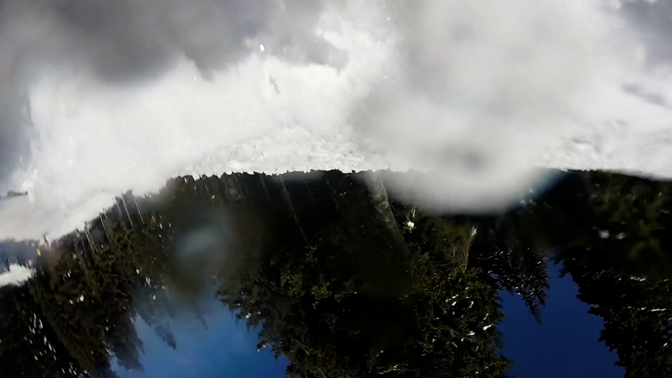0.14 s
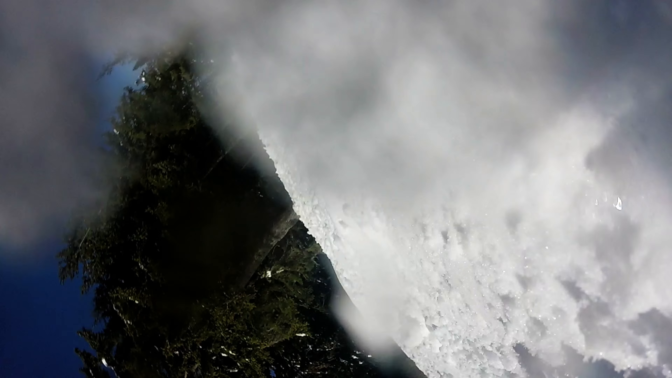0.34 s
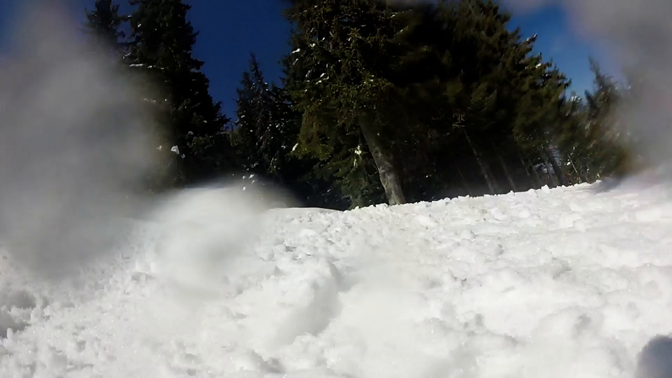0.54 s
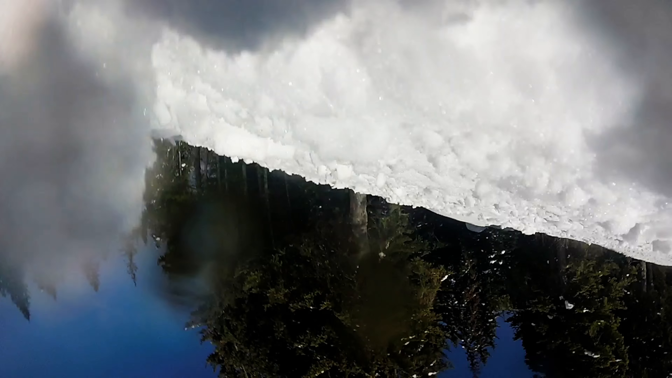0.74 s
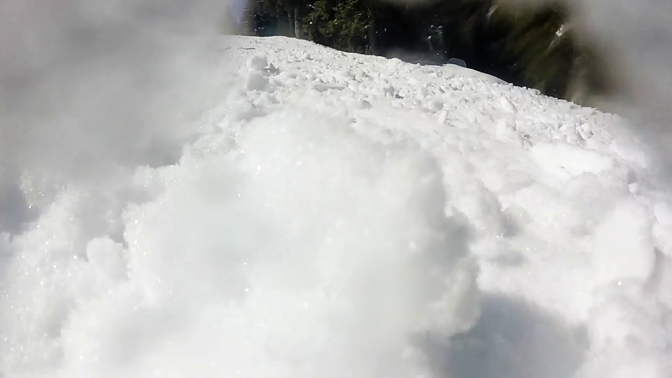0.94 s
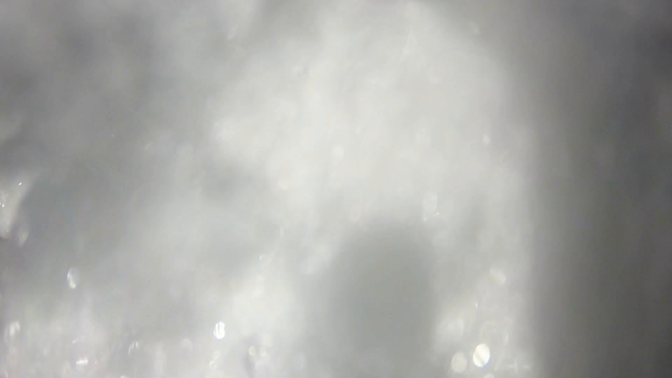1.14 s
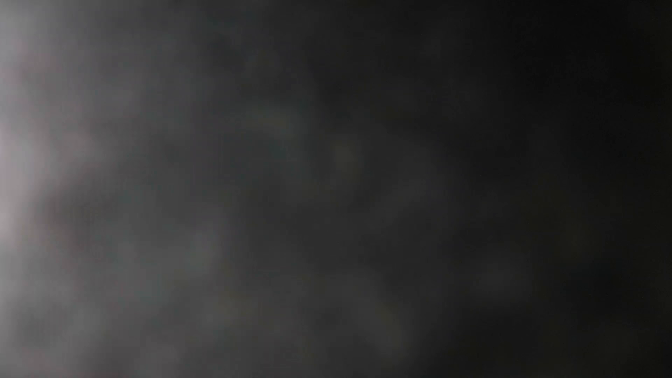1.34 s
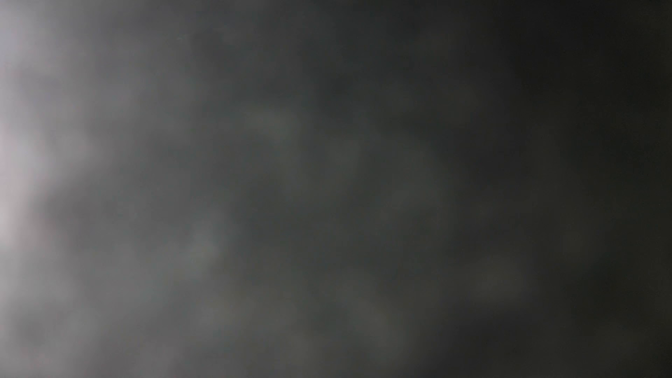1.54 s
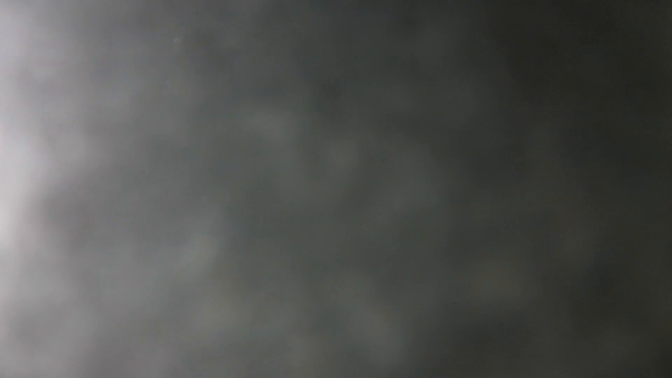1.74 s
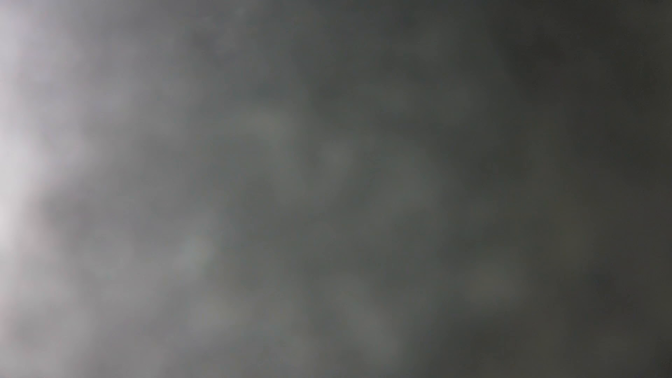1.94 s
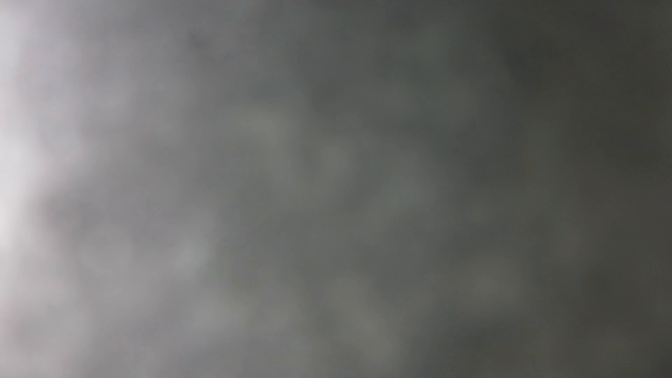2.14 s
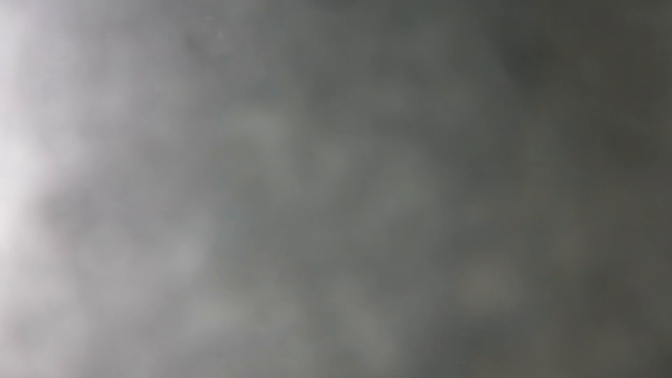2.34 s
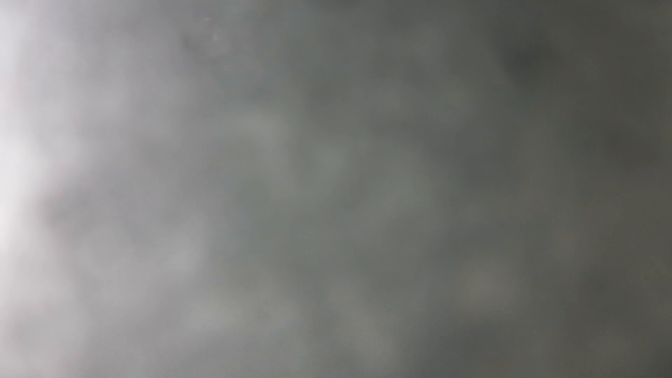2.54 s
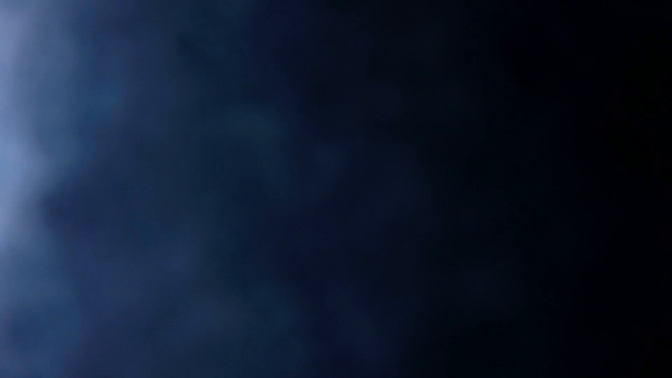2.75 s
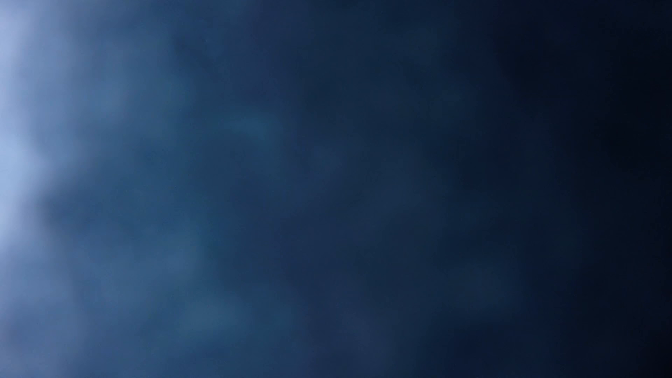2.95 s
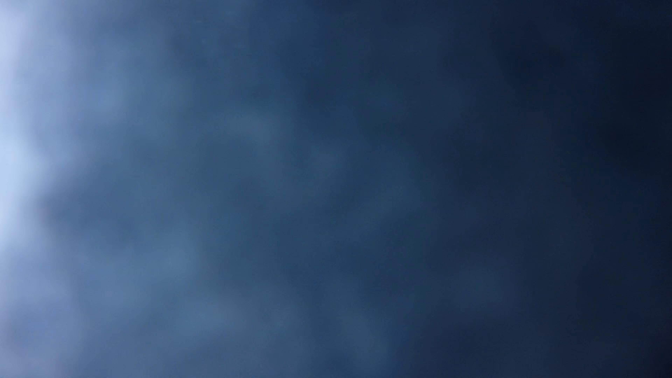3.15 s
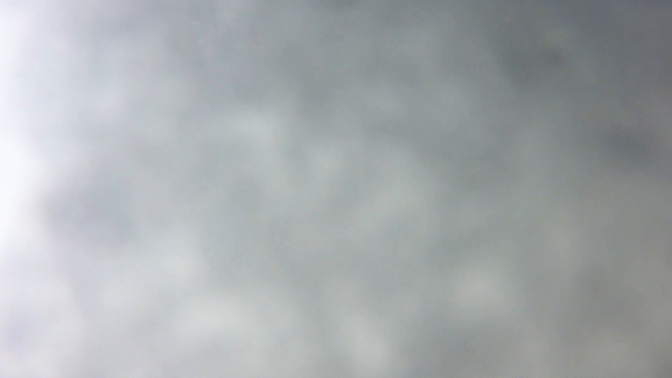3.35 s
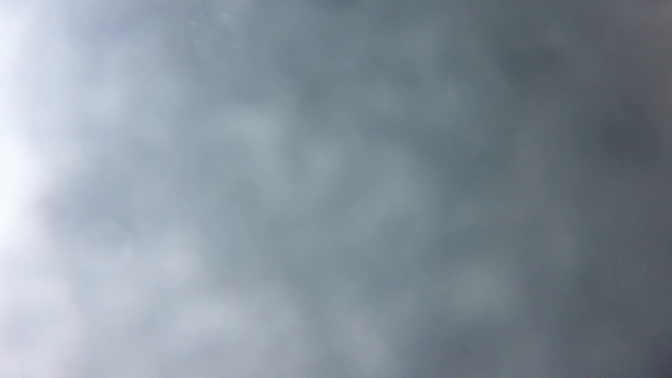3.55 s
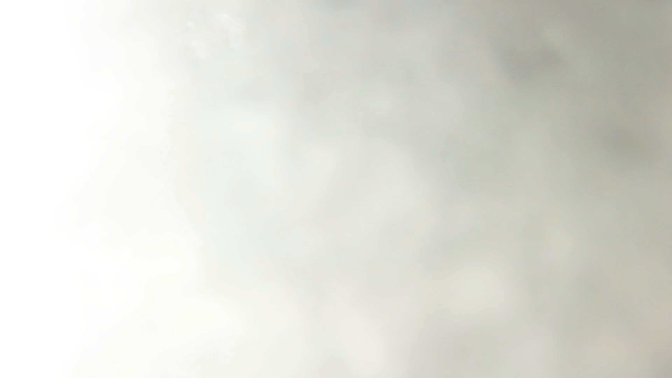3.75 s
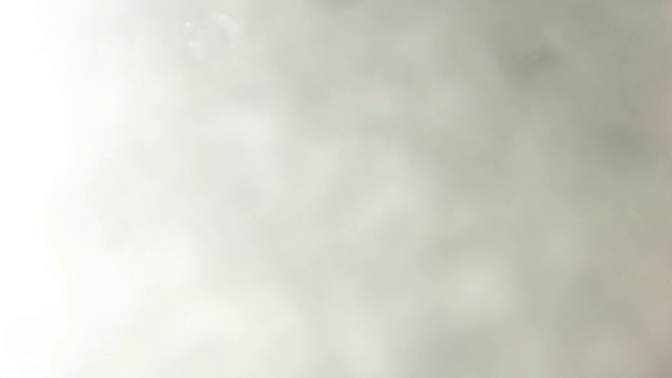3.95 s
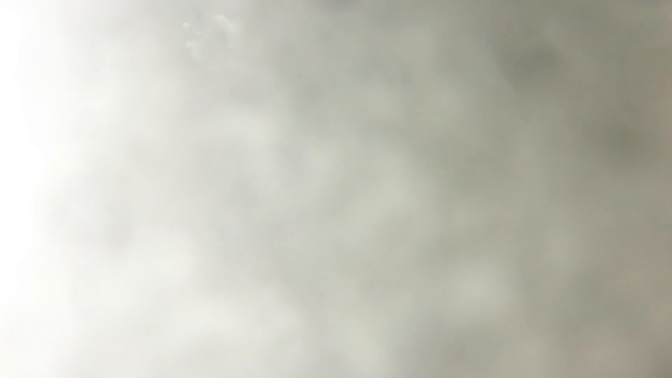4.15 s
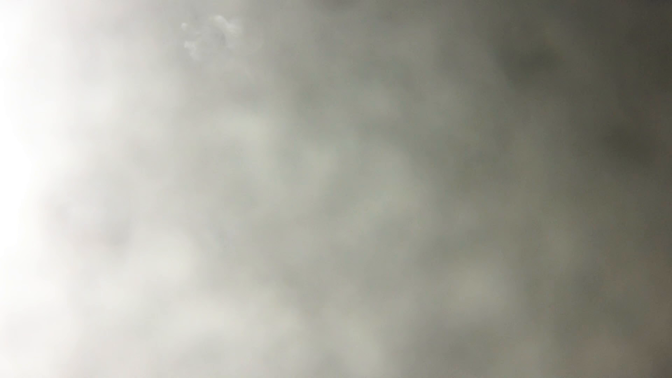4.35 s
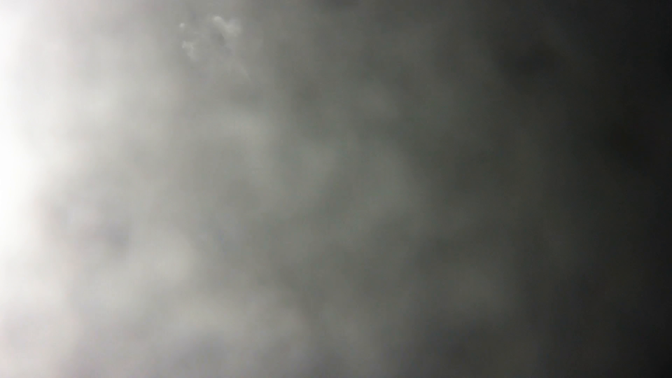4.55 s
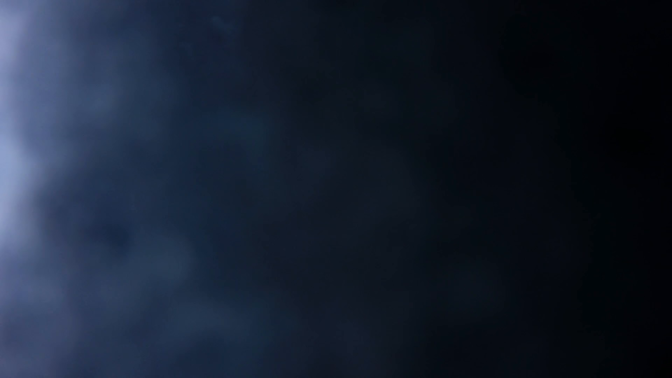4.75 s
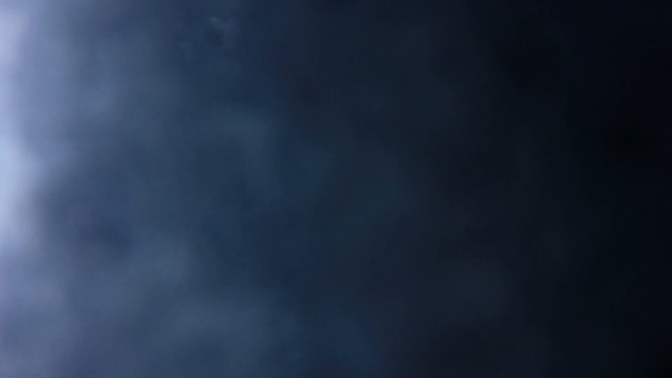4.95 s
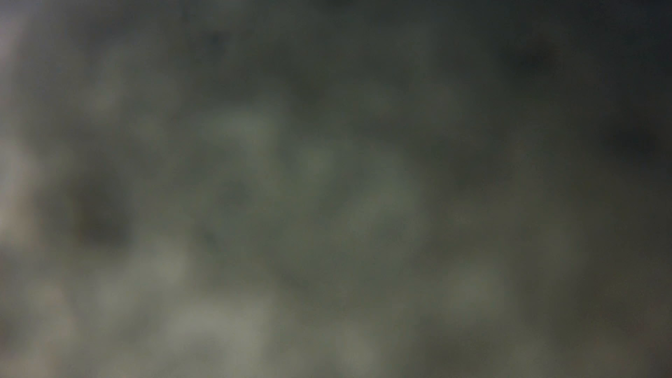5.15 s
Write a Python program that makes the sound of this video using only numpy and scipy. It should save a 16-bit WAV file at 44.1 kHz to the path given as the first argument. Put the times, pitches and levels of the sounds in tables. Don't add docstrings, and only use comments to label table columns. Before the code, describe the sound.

A small plastic-cased camera tumbles over crusty snow with loud clipped knocks and crunches, then slides softly and settles with dull faint knocks.

```python
import sys
import numpy as np
from scipy import signal
from scipy.fft import rfft, irfft, next_fast_len
from scipy.io import wavfile
from scipy.ndimage import uniform_filter1d, map_coordinates

SR = 44100
rng = np.random.default_rng(int(sys.argv[2]) if len(sys.argv) > 2 else 0)


def bounce(signal):
    frames = np.transpose(np.atleast_2d(signal))
    limited = np.clip(frames, -1, 1)
    pcm = np.round(limited * 32767).astype(np.int16)
    wavfile.write(sys.argv[1], SR, pcm)


def rack_gain(trim_db):
    fader = np.asarray(trim_db, float)
    return 10 ** (fader / 20)


N = 229320
TUMBLE_S = 1.5

# (time [s], hold [s], level [dB], grit over case ring [dB], grip [-])
IMPACTS = [
    (.0452, 0.0022, -6, -3, 1.3),
    (0.5913, .007, -12, 0.5, .6),
]
BOUNCES = [(.017, 0.0043, -47.5, -1, 1.3), (0.0418, .003, -29, 3, 2), (0.05, .004, -27, -8, 1.8),
           (0.059, .004, -36, -1, 1.3), (0.071, 0.0048, -46, 1, 1.8), (0.093, 0.014, -43, 4.5, 1.8),
           (.11, 0.012, -23, -2, 1), (.127, .005, -36, 0, 1.2), (.14, .004, -35, 0, 1),
           (0.145, 0.0092, -18.5, -14.5, .66), (0.173, .008, -52, 8, .7), (.2, .004, -35, 2, 1.2),
           (0.206, 0.022, -21.5, -4.5, 1.5), (.2375, .007, -25, 4, 1.5), (0.245, .007, -19, 3, 2),
           (0.256, 0.024, -31, -2.5, .8), (0.291, 0.016, -34, 2, 1.9), (.31, 0.014, -20, 1.5, 0.94),
           (0.331, 0.012, -19, -4.5, 0.68), (.344, .012, -30, -4, .8), (0.357, 0.032, -24.5, -8.5, 0.65),
           (.409, .006, -36.5, -9, .4), (0.43, 0.05, -17.5, -4.5, 1.5), (0.483, 0.022, -27.5, -1, .8),
           (.505, .01, -36, 0, 1), (.529, .017, -51, 4, 1), (0.49, 0.008, -28.5, -1, .8),
           (0.516, 0.01, -31.5, -9, .6), (0.547, 0.013, -34, 7.5, .2), (.562, .012, -34, 0, 1.2),
           (0.576, 0.014, -21, 2.5, 1.1), (.604, .012, -39, -5, 0.53), (0.618, 0.026, -28, -9.5, .64),
           (0.654, 0.016, -50, -12, 0.62), (.7215, .006, -34, -2, 1.2)]
SKIDS = [(0.732, 0.012, -15.5, -3, 1.5), (0.756, 0.024, -23, -4.5, 1.4), (.776, .014, -28, -2, 1.2),
         (0.791, 0.015, -19, -6.5, .9), (.811, 0.013, -13.5, -4, 1.47), (.826, .013, -29, -2, 1.2),
         (0.84, 0.024, -25.5, -1, 1.45), (.865, .01, -33, -2, 1.2), (0.876, 0.045, -29, -4.5, 1.1),
         (0.919, 0.032, -28, -2.5, 1.04), (0.94, 0.016, -25, -3, 1), (0.96, 0.035, -22, -4.5, 1.03),
         (0.999, 0.044, -31.5, -15.5, 0.76), (1.045, 0.04, -36.5, -12, 0.29), (1.088, .012, -32, -10, .6),
         (1.101, 0.077, -23, -10, 0.77), (1.145, 0.023, -18, -12.5, 0.58), (1.182, 0.028, -22.5, -6, 1),
         (1.21, 0.026, -16, -7.5, 1.44), (1.243, 0.027, -18, -3.5, 0.8), (1.274, 0.044, -24, -5.5, 0.88),
         (1.312, 0.023, -29, -5.5, 0.64), (1.335, 0.013, -29.5, -2.5, 0.51), (1.36, 0.0061, -49.5, -11, 1)]
# (bite [dB/s], lift-off [dB/s], crumbs below contact [dB], crumbs fade [dB/s])
IMPACT_SHAPE = (9000.5, 6999, -28, 1300)
BOUNCE_SHAPE = (7000, 2799, -22, 899.5)
SKID_SHAPE = (3001.5, 2203.5, -18.5, 1197.5)
# (frequency [Hz], width [Hz], level [dB])
STRUCK_CASE = [(1610, 160, 7), (2100, 680, 9), (2484, 280, 21)]
# (frequency [Hz], density [dB per Hz])
GRIT = [(500, -37.5), (2500, -3.5), (3500, 4.5), (5370, 3.5), (6300, 0.5), (7000, -18), (9000, -53)]
SPARKLE = [(4000, -41), (6500, -1), (7300, -0.5), (8100, -3), (11900, -8.5), (14900, -14), (16000, -43.5),
           (17000, -86)]
RUB = [(25, 7.5), (80, -2), (200, -5), (400, -12.5), (800, -15.5), (1300, -26), (2500, -50.5)]
MURMUR_DB = -3
SPARKLE_DB, SPARKLE_DB_PER_GRIP = -17, 7
BOOM_DB, BOOM_DB_PER_GRIP = -6.5, -5

# (time [s], peak level [dB], frequency [Hz])
CRUST_CRACKS = [(0.2114, -14.0, 2330), (0.2208, -13.0, 2300), (0.2254, -14.0, 2370), (0.248, -17.0, 2240),
                (0.2542, -16.0, 2480), (0.2586, -17.0, 1660), (0.3125, -14.0, 2280), (0.3248, -13.0, 2070),
                (0.3319, -13.0, 2150), (0.3356, -10.0, 1980), (0.3468, -20.0, 2110), (0.3575, -15.0, 2370),
                (0.3604, -15.0, 2280), (0.3659, -16.0, 1550), (0.3719, -14.0, 2200), (0.378, -20.0, 2240),
                (0.3834, -17.0, 1770), (0.4308, -10.0, 2480), (0.4394, -11.0, 2500), (0.4436, -6.0, 2350),
                (0.4512, -11.0, 2330), (0.4571, -9.0, 2610), (0.4625, -8.0, 2520), (0.4687, -12.0, 2370),
                (0.4749, -11.0, 2450), (0.4796, -16.0, 2670), (0.4956, -20.0, 2050), (0.5854, -12.0, 1740),
                (0.6268, -20.0, 2050), (0.6345, -21.0, 2220), (0.733, -11.0, 2390), (0.737, -13.0, 2350),
                (0.7397, -10.0, 2540), (0.7556, -20.0, 2260), (0.7605, -13.0, 2370), (0.7682, -12.0, 2370),
                (0.773, -21.0, 2540), (0.7775, -16.0, 2480), (0.7879, -18.0, 1740),
                (0.792, -11.0, 2410), (0.7998, -7.0, 1740), (0.8054, -7.0, 2480), (0.8143, -13.0, 2450),
               (0.8202, -5.0, 2090), (0.8231, -11.0, 1830), (0.8408, -18.0, 2370), (0.8478, -19.0, 2480),
               (0.8527, -18.0, 2540), (0.8568, -19.0, 2110), (0.9052, -20.0, 2500), (0.9158, -19.0, 2780),
               (0.9455, -13.0, 2110), (0.966, -15.0, 1980), (0.9721, -16.0, 2410), (0.9783, -10.0, 2280),
               (0.9858, -13.0, 2650), (0.9903, -11.0, 2000), (0.998, -20.0, 2110), (1.0021, -21.0, 2070),
               (1.0744, -22.0, 2070), (1.1034, -16.0, 2070), (1.1107, -15.0, 2200), (1.1199, -17.0, 1920),
               (1.1231, -17.0, 1890), (1.1391, -12.0, 1810), (1.1427, -11.0, 1890), (1.1507, -6.0, 1890),
               (1.1586, -6.0, 1740), (1.167, -9.0, 1980), (1.1739, -16.0, 1740), (1.1778, -16.0, 1960),
               (1.1831, -16.0, 2390), (1.1876, -17.0, 2130), (1.1992, -19.0, 3010), (1.2117, -7.0, 2520),
               (1.2168, -7.0, 2450), (1.2225, -10.0, 2410), (1.2266, -7.0, 2500), (1.2345, -13.0, 2330),
               (1.2418, -12.0, 1660), (1.249, -12.0, 2690), (1.2526, -12.0, 2650), (1.2586, -9.0, 1700),
               (1.265, -11.0, 2370), (1.272, -16.0, 2500), (1.2751, -16.0, 2670), (1.2821, -17.0, 2330),
               (1.3028, -21.0, 2430), (1.3182, -18.0, 1590),
                (.5832, -15, 3200),
    (.5885, -15, 3100),
    (.8025, -10, 1600),
    (1.1548, -11, 2500),
    (1.1625, -8, 1750),
]
# (pitch ratio [-], level [dB])
CRACK_SIDES = [(.68, -9), (1.3, -9)]
CRACK_RISE_S, CRACK_FALL_S, CRACK_DB, CRACK_SPLINTER_DB = .0008, .0015, -2.5, -14

# (time [s], length [s], level [dB], frequency [Hz], thud level [dB])
BLOWS = [
    (0.0464, 0.0011, -3, 2500, -6),
    (0.0482, 0.0011, -1, 2020, -6),
    (0.114, 0.0026, -10, 2200, -20),
    (0.118, 0.0026, -14, 2060, -13.5),
    (0.1455, 0.003, -10, 2000, -27),
    (0.1492, 0.003, -9, 1700, -27.5),
    (0.592, 0.004, -11, 4700, -40),
    (0.2452, 0.003, -11, 6200, -40),
    (0.594, 0.0035, -1, 2050, -24),
    (0.5972, 0.0027, -3, 2250, -5),
]
# (time [s], level [dB], frequency [Hz], T60 [s])
RATTLE = [
    (.05, -48, 2164, 0.14),
    (.05, -47.5, 716, 0.11),
    (.12, -36.5, 488, 0.11),
    (.15, -36, 704, 0.083),
    (.15, -53, 2164, .11),
    (.37, -40, 703, 0.22),
    (.5, -46, 720, 0.13),
    (.5, -37.5, 2161, 0.17),
    (0.602, -45, 493, 0.2),
    (.65, -55.5, 710, 0.15),
]
# (time [s], signed pressure [full scale], width [ms])
JOLTS = [(0.0454, -.7, 0.45), (0.0476, 1.15, .55), (0.118, 0.42, 3.3), (0.122, -0.31, 1.42),
         (0.159, -.03, 4.3), (0.248, 0.23, 0.85), (0.336, -0.15, 4.5), (0.358, 0.11, 1),
         (0.43, -0.085, 1.06), (0.4797, -0.3, 0.3), (0.4806, 0.45, .35), (0.4826, 0.2, 1.6),
         (0.5955, 0.15, 1.1), (0.605, -0.13, 2.6), (0.627, -.05, 1.5), (0.804, 0.12, 2.1),
         (0.825, -0.24, 1.67), (0.854, .04, 2.1), (0.919, 0.11, 2), (1.209, 0.15, 2.1), (1.216, 0.13, 0.4),
         (1.23, 0.13, 0.86), (1.322, 0.05, 0.8), (1.36, .05, 3.1), (2.712, .022, 13), (2.752, -.025, 16),
         (4.5, -.008, 2.9), (4.53, .004, 2.5)]

# (time [s], speed level [dB], loose powder spray [dB], weight on the body [dB])
SLIDES = [
    [(1.6, -71, -6, 2), (1.78, -68.5, -6, -0.5), (1.93, -62, -9, 0), (2.02, -56, -13, 0),
     (2.1, -53, -12, -3), (2.17, -50, -11, -5.5), (2.3, -45, -14, -11), (2.38, -42.5, -14, -12),
     (2.46, -39, -14.5, -12.5)],
    [(2.46, -39, -14.5, -12.5), (2.55, -40.5, -11, -11), (2.63, -41.5, -8, -10.5), (2.72, -46, -7, -16),
     (2.87, -47, -4.5, -22), (3.0, -53.5, -4, -4.5), (3.38, -65, -6, -6)],
    [(3.38, -66.5, -3, 1), (3.556, -56, -2, -12.5), (3.61, -50.5, -11, -13), (3.66, -55, -6, -12)],
    [(3.66, -55, -6, -12), (3.714, -51.5, -9.5, -12.5), (3.98, -44, -13, -21), (4.14, -46, -14, -14),
     (4.226, -47, -5.5, -11), (4.346, -41, -1, -18.5), (4.385, -41.5, -8, -32)],
    [(4.39, -55.5, -8, -29), (4.498, -62.5, -2, 5), (4.58, -57, -9, -8), (4.605, -53, -12, -4),
     (4.635, -55, -11, -3), (4.65, -50, -13, -8), (4.675, -51, -13, -7), (4.69, -61, -9, -10),
     (4.72, -65, -9, -10)],
]
# (time [s], length [s], level [dB])
ICE = [
    (1.7, 1.48, -74.5),
    (1.95, 0.59, -66.5),
    (2.82, 0.34, -64.5),
]
SHEEN = [
    (2.58, .14, -54),
    (2.74, .17, -53),
]
LUMPS = [
    (1.95, .1, -54),
    (2.38, .3, -48.5),
    (3.5, 0.16, -59),
]
EDGE_S = 0.096
# (frequency [Hz], width [Hz], level [dB])
POWDER = [(4300, 1200, 5.5), (5030, 900, -3), (6170, 1400, -4)]
FINE = [(6400, 930, 2), (7500, 900, 0)]
DENSE = [(3470, 580, 0), (5700, 1300, -10)]
THIN_SPRAY_DB, SPRAY_TURN_DB = -12, 3
# (frequency [Hz], density [dB per Hz])
GOUGE = [(500, -33), (1000, 1.5), (1700, 9), (3500, -5), (6200, -1.5), (7200, -22.5)]
# (frequency [Hz], width [Hz], level [dB])
CASE_LOW = [(1627, 140, 44), (1173, 500, 5)]
CASE_HIGH = [(2623, 200, -1.5), (2424, 160, -5)]
BEDDED_DB, BEDDED_PER_WEIGHT = 2, 1

# (time [s], peak level [dB], frequency [Hz], case ring [dB], puff [dB])
KNOCKS = [(2.913, -47.5, 346, -23, -19), (2.95, -51, 207, -14, -13), (3.027, -45, 330, -20, -10),
          (3.1, -55, 338, 2, -3), (3.561, -37, 330, -9, -5), (3.569, -40, 325, -12, -6),
          (3.583, -46, 380, -14, -6), (3.679, -36, 443, -12, -7), (3.686, -37, 323, -14, -27),
          (4.261, -43.5, 313, -7, -8), (4.491, -23, 284, -19, -17), (4.54, -31, 240, -10, -12),
          (4.581, -32.5, 286, -20, -12), (4.613, -41.5, 310, -21, -4), (4.636, -40, 316, -17, -22),
          (4.657, -46, 300, -18, -6), (4.667, -47, 220, -18, -9)]
KNOCK_T60_S, KNOCK_T60_S_PER_DB = 0.032, .0005
# (time [s], peak level [dB], frequency [Hz], splinter level [dB])
TICKS = [(0.4737, -3, 6400, -24), (0.5793, -5, 6900, -25), (0.5805, -8, 3200, -36),
         (0.9138, -13, 5500, -25), (0.9434, -21, 4040, -22), (0.7765, -17, 3500, -25),
         (1.0725, -18, 2200, -30), (1.1917, -6, 4070, -31), (1.3144, -12, 3800, -28),
         (1.7789, -43.5, 4010, -33.5), (1.9924, -45, 6220, -21), (2.2594, -58, 4630, 0),
         (2.3044, -44, 3000, -19), (3.2784, -45, 4240, -17), (3.5169, -31.5, 4300, -34),
         (3.6144, -50, 3150, -8), (4.0194, -44, 3560, -22), (4.2453, -31, 4830, -27),
         (4.4667, -40.5, 3490, -17.5), (4.573, -37, 4190, -22), (4.595, -41, 3670, -22),
         (4.6493, -46, 3030, -30.5), (4.8344, -37, 4690, -21), (4.8514, -39, 4630, -20.5),
         (4.8814, -57.5, 3310, -12), (5.0474, -50, 4290, -13.5), (5.1537, -45, 4100, -10.5)]

# (frequency [Hz], density [dB per Hz])
HISS = [(25, -2.5), (100, -2.5), (600, -12.5), (1150, -18.5), (3200, -18.5), (6500, -23.5), (7800, -29),
        (15000, -36.5)]
# (time [s], level [dB])
HISS_LEVEL = [(0, -71.5), (1.4, -63.5), (1.6, -65), (2, -58.5), (3, -57.5), (5.2, -59)]


def unit(x):
    return x / np.sqrt(np.mean(x ** 2) + 1e-20)


def curves(rows):
    s, *cols = np.transpose(rows)
    return [np.interp(np.arange(N) / SR, s, c) for c in cols]


def filtered(x, response):
    m = next_fast_len(N + SR // 2)
    return irfft(rfft(x, m) * response(np.fft.rfftfreq(m, 1 / SR)), m)[:N]


def coloured(x, spectrum):
    f, db = np.transpose(spectrum)
    return unit(filtered(x, lambda hz: rack_gain(np.interp(np.log(hz + 1), np.log(f + 1), db))))


def ringing(x, modes, top_hz):
    def body(f):
        return sum(rack_gain(db) * 1j * f * w / (c * c - f * f + 1j * f * w) for c, w, db in modes)

    def wall(f):
        return signal.freqs(*signal.butter(8, top_hz, analog=True), f)[1]

    return unit(filtered(x, lambda f: body(f) * wall(f)))


def wobble(rate):
    knots = rng.standard_normal(int(N * 400 / SR) + 4)
    return map_coordinates(knots, [np.arange(N) * min(rate, 400) / SR])


def grains(spiky_db, clump_db, clump_rate):
    clumps = 1.5 * np.tanh(wobble(clump_rate) / 1.5)
    spikes = np.minimum(rng.exponential(size=N), 4)
    size = rack_gain(spiky_db * spikes + clump_db * clumps)
    return unit(size * rng.standard_normal(N))


def patchy(x, depth_db):
    z = signal.stft(x, nperseg=128)[2]
    field = uniform_filter1d(rng.standard_normal(z.shape), size=3, axis=0)
    field = uniform_filter1d(field, size=9, axis=1)
    return unit(signal.istft(z * rack_gain(depth_db * unit(field)), nperseg=128)[1][:N])


def case(push, balance_db):
    low = 1 / (1 + rack_gain(-2 * balance_db))
    low_ring = ringing(push, CASE_LOW, top_hz=2090)
    high_ring = ringing(push, CASE_HIGH, top_hz=2860)
    return np.sqrt(low) * low_ring + np.sqrt(1 - low) * high_ring


def contacts(rows, shape):
    bite, lift, crumbs_db, fade = shape
    s, hold, db, grit_db, grip = np.transpose(rows)[:, :, None]
    t = np.arange(int(TUMBLE_S * SR)) / SR
    before = np.maximum(s - t, 0)
    after = np.maximum(t - s - np.abs(hold), 0)
    level = rack_gain(db - bite * before) * (rack_gain(-lift * after) + rack_gain(crumbs_db - fade * after))
    return level ** 2 + 1e-30, grit_db, grip


def tumble():
    groups = [(IMPACTS, IMPACT_SHAPE), (BOUNCES, BOUNCE_SHAPE), (SKIDS, SKID_SHAPE)]
    power, grit_db, grip = map(np.vstack, zip(*[contacts(rows, shape) for rows, shape in groups]))
    total = power.sum(axis=0)
    mean_grit_db = (power * grit_db).sum(axis=0) / total
    mean_grip = (power * grip).sum(axis=0) / total
    controls = [np.sqrt(total), mean_grit_db, mean_grip]
    force, grit_db, grip = np.pad(controls, [(0, 0), (0, N - len(total))])

    push = grains(spiky_db=2.5, clump_db=2, clump_rate=380)
    share = np.exp(-(np.clip(grip, 0, 2) - np.arange(3)[:, None]) ** 2 / .75)
    modes = [ringing(ringing(push, [(2140, 1700, 0)], top_hz=6060), [mode], top_hz=3200)
             for mode in STRUCK_CASE]
    ring = np.sum(share * modes, axis=0) / np.sqrt(np.sum(share ** 2, axis=0))
    ring += rack_gain(BOOM_DB + BOOM_DB_PER_GRIP * grip) * ringing(push, [(1000, 1200, 0)], top_hz=1500)

    crushed = 0.19 * push + 2.4 * grains(spiky_db=4.0, clump_db=1.0, clump_rate=200)
    grit = patchy(coloured(crushed, GRIT), depth_db=3.5)
    sparkle_db = SPARKLE_DB + SPARKLE_DB_PER_GRIP * grip
    grit += rack_gain(sparkle_db) * patchy(coloured(crushed, SPARKLE), depth_db=0.0)
    crunch = (rack_gain(MURMUR_DB) * ring + rack_gain(grit_db) * grit) / np.sqrt(1 + rack_gain(2 * grit_db))
    rub = coloured(grains(spiky_db=5.4, clump_db=2.7, clump_rate=60), RUB)
    drag = rack_gain(-16.0) * uniform_filter1d(force, size=300) * rub
    return force * crunch + drag


def cracks():
    out, t = np.zeros(N + SR), np.arange(-200, 400) / SR
    swell = np.exp(-.5 * (t / np.where(t < 0, CRACK_RISE_S, CRACK_FALL_S)) ** 2)
    splinters = coloured(rng.standard_normal(N), GRIT)
    rows = CRUST_CRACKS
    for (s, db, hz), (turn, bend, loose) in zip(rows, rng.uniform(-1, 1, (len(rows), 3))):
        i = round(s * SR) - 200
        note = np.sin(2 * np.pi * hz * t * (1 + 15 * bend * t) + np.pi * turn)
        for ratio, side_db in CRACK_SIDES:
            side_hz = hz * ratio * (1 + .1 * bend)
            note += rack_gain(side_db + 4 * loose) * np.sin(2 * np.pi * side_hz * t + 3 * loose)
        spray = rack_gain(CRACK_SPLINTER_DB) * swell * splinters[i:][:len(t)]
        out[i:][:len(t)] += rack_gain(db + CRACK_DB) * swell * (note + spray)
    return out[:N]


def blows():
    t = np.arange(int(TUMBLE_S * SR)) / SR
    out = np.zeros(len(t))
    for s, length, db, hz, thud_db in BLOWS:
        u = np.clip((t - s) / length, 0, 1)
        contact = np.abs(np.sin(np.pi * u)) ** .4 * (u > 0) * (u < 1)
        thud = np.sin(2 * np.pi * 800 * (t - s)) + 1.2 * np.sin(2 * np.pi * 1250 * (t - s))
        out += rack_gain(db) * contact * (np.sin(2 * np.pi * hz * (t - s)) + rack_gain(thud_db) * thud)
    for s, db, hz, t60 in RATTLE:
        u = np.maximum(t - s, 0)
        out += rack_gain(db - 60 * u / t60) * np.sin(2 * np.pi * hz * u)
    return np.pad(out, (0, N - len(t)))


def jolts():
    t = np.arange(N) / SR
    pressure = sum(size * np.exp(-.5 * ((t - s) * 1000 / width_ms) ** 2) for s, size, width_ms in JOLTS)
    vent_hz, damping = 32, 2.2
    return filtered(pressure, lambda f: -f * f / (vent_hz ** 2 - f * f + 1j * damping * f * vent_hz))


def patches(rows):
    t = np.arange(N) / SR
    return sum(rack_gain(db) * np.clip(np.minimum(t - s, s + length - t) / EDGE_S + .5, 0, 1) ** 2
               for s, length, db in rows)


def slide():
    push = grains(spiky_db=2.3, clump_db=2.0, clump_rate=48)
    powder = ringing(ringing(rng.standard_normal(N), POWDER, top_hz=6800), POWDER, top_hz=6790)
    powder += rack_gain(-21) * coloured(push, SPARKLE)
    packed = ringing(rng.standard_normal(N), DENSE, top_hz=6700)
    fine = ringing(ringing(rng.standard_normal(N), FINE, top_hz=7800), FINE, top_hz=7850)
    lumps = grains(spiky_db=2, clump_db=2.5, clump_rate=45)
    rub = ringing(lumps, [(338, 177, 29), (505, 200, -28)], top_hz=1510)
    skin = [(4300, 1300, 0)]
    sheen = ringing(ringing(push, skin, top_hz=5600), skin, top_hz=5600)

    controls = np.zeros((3, N))
    for rows in SLIDES:
        speed_db, spray_db, weight_db = curves(rows)
        start, end, edge = rows[0][0], rows[-1][0], .003
        moving, = curves([(start - edge, 0), (start + edge, 1), (end - edge, 1), (end + edge, 0)])
        controls += moving * np.array([rack_gain(speed_db), spray_db, weight_db])
    speed, spray_db, weight_db = controls

    loose = 1 / (1 + np.exp((THIN_SPRAY_DB - spray_db) / SPRAY_TURN_DB))
    powder = np.sqrt(loose) * powder + np.sqrt(1 - loose) * packed
    body = case(push, BEDDED_DB + BEDDED_PER_WEIGHT * weight_db)
    body += rack_gain(spray_db) * powder + rack_gain(weight_db) * rub
    ground = patches(ICE) * fine + patches(SHEEN) * sheen + patches(LUMPS) * coloured(lumps, GOUGE)
    return speed * body + ground


def knocks():
    out, t = np.zeros(N + SR), np.arange(SR // 10) / SR
    flash = case(rng.standard_normal(N), -5)
    puff = ringing(rng.standard_normal(N), [(125, 70, 12.0), (520, 130, 13.5), (750, 280, -51)], top_hz=940)
    crack = ringing(rng.standard_normal(N), [(680, 174, -9), (1600, 150, -7), (2570, 400, 3)], top_hz=3720)
    crack = ringing(crack, [(650, 300, 0), (1600, 300, 0), (2570, 700, 0)], top_hz=3700)
    for s, db, hz, ring_db, puff_db in KNOCKS:
        i = round((s + .0015) * SR)
        here = slice(i, i + len(t))
        t60 = KNOCK_T60_S + KNOCK_T60_S_PER_DB * (db + 23)
        swell = rack_gain(-60 * t / t60) * (1 - np.exp(-t / 0.003)) * 3
        note = np.sin(2 * np.pi * hz * t) + rack_gain(puff_db) * puff[here] + rack_gain(ring_db) * flash[here]
        snap = rack_gain(ring_db + 11 - 60 * t / .01) * (1 - np.exp(-(t / .0015) ** 2)) * crack[here]
        out[here] += rack_gain(db) * (swell * note + snap)
    return out[:N]


def ticks():
    out, t = np.zeros(N + SR), np.arange(SR // 200) / SR
    fade = rack_gain(-60 * t / .0025)
    for (s, db, hz, high_db), scatter in zip(TICKS, rng.standard_normal((len(TICKS), 1))):
        splinter = np.sin(2 * np.pi * 9800 * (1 + 0.025 * scatter) * t)
        click = np.sin(2 * np.pi * hz * t) + rack_gain(high_db + 9.5) * splinter
        out[round((s + .0013) * SR):][:len(t)] += rack_gain(db + 1.5) * fade * click
    return out[:N]


def noise_floor():
    hiss_db, = curves(HISS_LEVEL)
    hiss = coloured(rng.standard_normal(N), HISS)
    murmur = rack_gain(-8.5) * case(rng.standard_normal(N), -3.5)
    return rack_gain(hiss_db + 1.2 * wobble(8)) * (hiss + murmur)


def scene():
    tumbling = tumble() + cracks() + blows() + jolts()
    settling = slide() + knocks() + ticks()
    return (tumbling + settling + noise_floor())[None]


def low_pass(x):
    return signal.sosfilt(signal.butter(12, 16300, fs=SR, output="sos"), x)


def record(dry):
    top, hardness = 1.02, 4
    clipped = dry[0] / (1 + np.abs(dry[0] / top) ** hardness) ** (1 / hardness)

    def converter(hz):
        coupling = 1j * hz / (10 + 1j * hz)
        return coupling / (1 + (hz / 15300) ** 40)

    return low_pass(filtered(clipped, converter)[None])


dry = scene()
out = record(dry)
bounce(out)
```